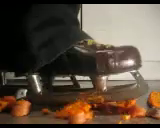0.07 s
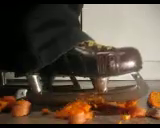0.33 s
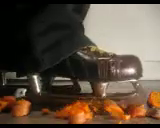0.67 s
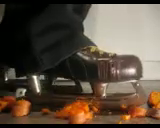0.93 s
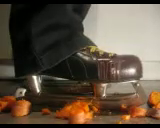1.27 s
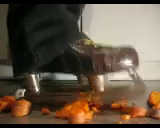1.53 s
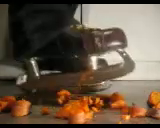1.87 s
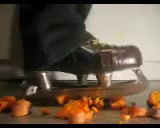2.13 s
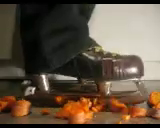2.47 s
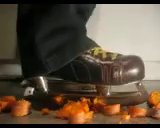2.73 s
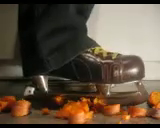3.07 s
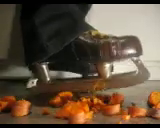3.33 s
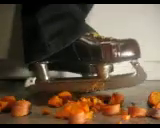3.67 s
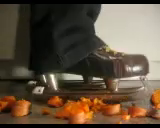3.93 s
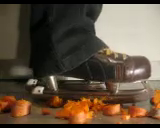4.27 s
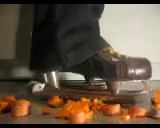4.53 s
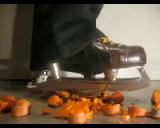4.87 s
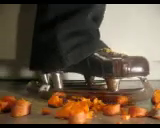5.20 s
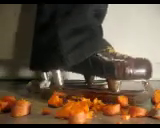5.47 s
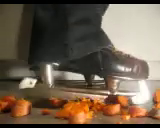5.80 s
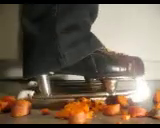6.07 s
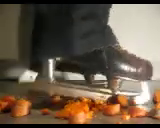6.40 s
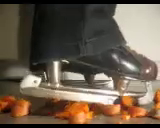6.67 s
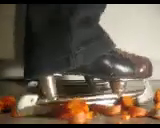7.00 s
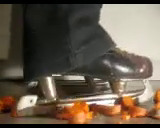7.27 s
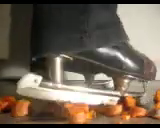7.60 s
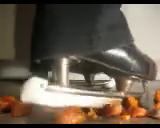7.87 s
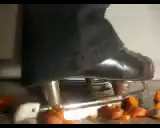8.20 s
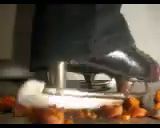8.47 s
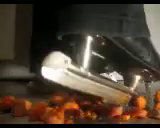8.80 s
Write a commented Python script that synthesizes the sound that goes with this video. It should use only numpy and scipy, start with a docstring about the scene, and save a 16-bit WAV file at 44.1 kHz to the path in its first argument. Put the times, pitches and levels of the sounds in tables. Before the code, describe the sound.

In a small room, an ice skate stamps repeatedly on carrots on a hard floor. The carrots snap and crunch in irregular clusters, the steel blade giving tiny metallic clicks before it knocks dully on the floor. Between stamps it scrapes softly through wet pulp and crumbs. The heaviest steps leave a deep, brief rumble. The microphone sits near the floor, sounds dull, distorts on the hardest hits and picks up faint hiss and hum.

```python
"""Carrots snap and crunch under an ice skate stamping on a hard floor in a small room.
The steel blade rings briefly, breaks through, knocks on the floor, then drags through pulp and crumbs.
The floor sways under the heaviest steps. Behind it: hiss, a low hum and a thin whine.
The microphone is dull and clips the hardest hits."""
import sys
import numpy as np
from scipy import signal
from scipy.fft import rfft, irfft, next_fast_len
from scipy.io import wavfile
from scipy.ndimage import map_coordinates

SR = 44100
rng = np.random.default_rng(int(sys.argv[2]) if len(sys.argv) > 2 else 0)


def put_to_file(sound):
    """Save the sound as 16-bit audio at rate SR, in the file named by the first command-line argument."""
    columns = np.atleast_2d(sound).T  # one column per channel
    safe = np.clip(columns, -1, 1)
    whole_steps = np.round(safe * 32767)
    wavfile.write(sys.argv[1], SR, whole_steps.astype(np.int16))


N = 393813

# steel blade modes, damped by pulp: (frequency [Hz], level [dB], t60 [s])
BLADE_MODES = [(2560, -5, .011), (2900, -4, .015), (3130, 0, .019), (3300, -1, .017), (4400, -12, .01)]
# bursting carrot cells: (frequency [Hz], spectral density [dB])
CRACKLE_SPECTRUM = [(200, -12), (600, -1), (1100, -2.5), (1700, -10.5), (2500, -11.5), (3300, -7.5),
                    (3900, -8.5), (5000, -8), (6000, -8.5), (8000, -25)]
# blade slides through pulp: (middle [s], length [s], level [dB], rasp above 2 kHz [dB])
DRAG_STROKES = [(0.542, 0.11, -39, -1.5), (0.92, 0.031, -42, -5), (1.032, 0.096, -46, -22),
                (1.63, 0.34, -49, -3), (1.897, 0.072, -45, -2.5), (2.173, 0.11, -47, 7.5),
                (2.728, 0.24, -51.5, 2.5), (3.218, 0.1, -39.5, -17), (3.334, 0.061, -45.5, 5),
                (3.9, 0.08, -39, -1.5), (3.984, 0.1, -31, -6.5), (4.535, 0.039, -37.5, -7.5),
                (4.59, 0.036, -34.5, -14), (4.945, 0.12, -43.5, 1.5), (5.465, 0.038, -43.5, 5.5),
                (5.54, 0.14, -40.5, -9), (5.864, 0.074, -46.5, -11), (5.985, 0.31, -39.5, -3),
                (6.133, 0.086, -47, -0.5), (6.376, 0.14, -37.5, -5.5), (6.851, 0.2, -44, -4),
                (7.103, 0.17, -46.5, 1), (7.264, 0.05, -44, -2), (7.394, 0.25, -47, -2),
                (8.415, 0.38, -44, -16), (8.873, 0.081, -33.5, 2)]


def snaps(splinter_db=-8):
    """A carrot fractures: sharp crack, short spray of splinters, ring of the blade."""
    # (time [s], level [dB], pitch [Hz], blade ring [dB])
    fractures = [(0.3914, -12.5, 2700, -16), (0.43, -25.5, 2400, -8), (0.467, -23, 2900, -9.5),
                 (0.594, -11, 2400, -22), (0.6438, -5, 2200, -36), (0.6492, 6.5, 2200, -24),
                 (0.8365, -39, 3200, 4), (0.994, -22.5, 1800, -32), (1.5248, -13.5, 2000, -24),
                 (1.5466, -8.5, 2520, -15.5), (1.6197, -20.5, 3100, -15), (2.1082, -26.5, 3100, -5),
                 (2.128, -22.5, 1900, -10), (2.163, -22, 2900, -7), (2.248, -32, 3000, 5),
                 (2.2719, -20, 3200, -15), (2.29, -24, 3100, -7), (2.304, -27, 3200, 4),
                 (2.3526, -12, 2200, -14.5), (2.359, -14, 3200, -7.5), (2.4081, -18.5, 3100, -6),
                 (2.4431, -8, 2900, -10.5), (2.453, -14, 3100, -3), (2.631, -25, 3400, -5),
                 (3.182, -22, 1900, -33), (3.247, -18, 2400, -26), (3.3198, -11.5, 2800, -12.5),
                 (3.398, -33.5, 2700, -5), (4.107, -17.5, 2700, -19), (4.121, -29, 3400, 7.5),
                 (4.169, -20, 2700, -30), (4.5958, -16.5, 2000, -36), (4.6813, -8.5, 3100, -16),
                 (4.909, -18, 2700, -21), (5.01, -24, 2900, -10), (5.018, -7, 2400, -21),
                 (5.0436, -1, 2400, -21), (5.09, -5.5, 2900, -17), (5.1065, -9.5, 2000, -27),
                 (5.1088, -3, 2900, -8), (5.283, -21.5, 3200, -2.5), (6.1553, -19, 3200, -7),
                 (6.408, -17.5, 2600, -21), (6.995, -25, 1900, -31), (6.996, -4.5, 2600, -15),
                 (7.3466, -20.5, 2300, -24), (7.657, -17.5, 2200, -25), (7.9485, -31, 1700, -28.5),
                 (8.0334, -17, 2880, -18), (8.1345, -18.5, 3100, -2.5), (8.157, -10, 4300, -30),
                 (8.2578, -20, 2100, -24), (8.33, -27, 2000, -12)]
    out, t = np.zeros(N), np.arange(SR // 20) / SR
    for s, db, hz, ring_db in fractures:
        crack = push(low_hz=0.047 * hz, high_hz=3.8 * hz + 600, order=3)
        band = signal.butter(1, [0.5 * hz, 0.91 * hz], "band", fs=SR, output="sos")
        splinters = unit(signal.sosfilt(band, rng.standard_normal(len(t))))
        fade = amp(-60 * t / 0.0052) + amp(-17 - 60 * t / 0.063)
        steel = ring(BLADE_MODES, scatter_db=2.5, detune=0.012)
        add(out, s, amp(db - 10) * crack)
        add(out, s, amp(db + splinter_db) * fade * splinters)
        add(out, s, amp(db + ring_db + 16.5) * steel)
    return out + amp(-14) * echo(out)


def crunch():
    """Cells burst in dense runs as the edge sinks in, shaking blade and floor."""
    # (start [s], length [s], level [dB], bite [dB], growth [dB], release t60 [s], body [dB], ring [dB])
    cuts = [(0.593, 0.065, -31, 30, 16, 0.025, 2, -11), (1.547, 0.11, -50, 17, -9, 0.3, -4, 1),
            (2.269, 0.039, -28, 0, -15, 0.16, -3.5, -2.5), (2.362, 0.1, -42.5, 12.5, 3, 0.05, 0, -1),
            (2.43, 0.033, -25, 4, 3.5, 0.019, -4.5, -5), (2.619, 0.034, -36.5, -9, -4, 0.13, -18.5, 2.5),
            (4.118, 0.051, -44.5, 16.5, -4, 0.35, -22, 6), (5.013, 0.11, -31, -2.5, -1, 0.26, 0, -1),
            (5.272, 0.075, -44.5, 10.5, -4, 0.15, -15, -0.5), (5.981, 0.038, -48.5, -5.5, 6.5, 0.15, 5, 7),
            (6.945, 0.052, -33, 0, 20, 0.16, 4, -20), (7.881, 0.075, -38, 7.5, 18, 0.084, 0.5, -1.5),
            (8.033, 0.13, -28.5, 1.5, 5.5, 0.18, -1.5, -4.5), (8.846, 0.061, -37.5, -9, -4, 0.26, -17, -7)]
    # low body of the crunch: (frequency [Hz], spectral density [dB])
    body_spectrum = [(30, -14), (70, 0), (98, -9.5), (125, -5), (190, -1), (260, 4.5), (350, -7),
                     (500, -1.5), (650, -12.5), (1000, -14), (2000, -38.5)]
    cells = unit(bursts(per_s=4800, spread_db=3.5) * amp(3.8 * wobble(300)))  # fibres give way in clumps
    crackle, body = coloured(cells, CRACKLE_SPECTRUM), coloured(cells, body_spectrum)
    out = np.zeros(N)
    for start_s, length_s, db, bite_db, growth_db, release_s, body_db, ring_db in cuts:
        gain = amp(db) * cut_envelope(start_s, length_s, bite_db, growth_db, release_s)
        out += gain * (amp(-4) * crackle + amp(body_db - 1) * body)
        steel = ring(BLADE_MODES, scatter_db=1.5, detune=0.012)  # each carrot loads it differently
        out += amp(ring_db - 3.5) * signal.oaconvolve(gain * cells, steel)[:N]
    return out + amp(-17) * echo(out)


def cut_envelope(start_s, length_s, bite_db, growth_db, release_s, entry_s=0.00091, bite_s=0.01):
    """The edge bursts the skin, sinks in under changing pressure and is through; the crackle dies."""
    t = np.maximum(np.arange(N) / SR - start_s, 0)
    skin_db = bite_db * np.exp(-t / bite_s)
    pressure_db = growth_db * (np.minimum(t / length_s, 1) - 0.5)
    release_db = -60 * np.maximum(t - length_s, 0) / release_s
    return np.minimum(t / entry_s, 1) * amp(np.maximum(skin_db + pressure_db + release_db, -200))


def knocks(rebound_cycles=2.114):
    """Blade and carrot pieces hit the floor. Pulp cushions: softer contact, lower thud, later rebound."""
    # (time [s], level [dB], contact hardness [Hz], floor ring [dB], room [dB])
    hits = [(0.594, -7, 1410, -2, -6.5), (0.655, -6, 920, 4, -4.5), (1.2126, -10, 660, 2.5, -5.5),
            (1.435, -23, 1500, -30, -1), (2.1258, -32.5, 700, 11.5, 6.5), (2.273, -17.5, 920, 6, -18),
            (2.4642, -12.5, 360, 0, -15), (2.881, -8.5, 920, 3.5, -4.5), (2.8906, -7.5, 640, -4, -10.5),
            (3.9065, -8.5, 843, 4, -7.5), (4.3463, 0, 1174, -7.5, -7.5), (5.107, -27.5, 1170, 0, -10),
            (6.4969, -12, 783, 4.5, -12.5), (6.9803, -17.5, 1550, -12, 6), (6.994, -8, 1480, 9.5, -18),
            (7.038, -21.5, 450, -5.5, -8), (7.1977, -30, 1480, -16, 0), (7.2144, -29, 1400, -14, -5),
            (7.229, -26.5, 1410, -15, -1.5), (7.347, -27.5, 1480, -11, 3), (7.931, -18.5, 840, 2.5, 0.5),
            (7.9477, -8.5, 1390, 6.5, -9.5), (8.034, -20, 850, 9.5, 5.5), (8.0749, -15.5, 900, 9.5, -14),
            (8.086, -14.5, 1070, 9.5, 4), (8.183, -16, 326, -2.5, -11), (8.633, -27, 2070, -17, -5)]
    # (frequency [Hz], level [dB], t60 [s])
    floor_modes = [(73.6, -19, 0.33), (127.3, -2.5, 0.37), (160.1, -5.5, 0.23), (186.6, -8, 0.32),
                   (251, -7, 0.22), (272.5, 5, 0.11), (348, -11, 0.04), (408, -12, 0.019), (500, 1, 0.031)]
    out = np.zeros(N)
    for s, db, hz, floor_db, room_db in hits:
        blow = -push(low_hz=0.19 * hz, high_hz=hz, order=5)
        rebound = -push(low_hz=0.28 * hz, high_hz=0.65 * hz, order=4)
        floor = signal.fftconvolve(blow, ring(floor_modes, scatter_db=4, detune=0.015))[:len(blow)]
        add(out, s, amp(db) * (blow + amp(floor_db - 16) * floor + amp(room_db - 3.5) * echo(blow)))
        add(out, s + rebound_cycles / hz, amp(db - 4) * rebound)
    return out


def drags(rasp_hz=2000):
    """The sliding edge grinds wet crumbs in jerks; shifting contact favours one mode after another."""
    # (frequency [Hz], width [Hz], level [dB])
    scrape_modes = [(238, 230, 0.5), (746, 320, -1), (1145, 160, -3.5), (1730, 58, -6.5), (2220, 2100, -7),
                    (2850, 93, -5.5), (3090, 57, -2), (4260, 270, -14.5)]
    # (frequency [Hz], spectral density [dB])
    pulp_spectrum = [(100, 4), (260, 4), (400, -2), (1000, -2), (1600, -9.5), (3000, 3.5), (4500, -42.5),
                     (6000, -2)]
    jerks = amp(3 * wobble(110))
    slips = jerks * bursts(per_s=3600, spread_db=1.5)
    creak = np.zeros(N)
    for hz, width_hz, db in scrape_modes:
        contact = amp(6 * wobble(30))
        creak += amp(db) * contact * unit(filtered(slips, resonance(hz, width_hz)))
    grind = amp(-4) * unit(creak) + amp(-2) * coloured(slips, pulp_spectrum)
    rub = filtered(grind, lambda hz: 1 / (1 + (hz / rasp_hz) ** 6))
    rasp = grind - rub
    out = sum(amp(db) * arch(middle_s, length_s) * (rub + amp(rasp_db) * rasp)
              for middle_s, length_s, db, rasp_db in DRAG_STROKES)
    return out + amp(-13.5) * echo(out)


def crumbs():
    """Crumbs pop at random: many under the sliding edge, a few faint ones under the resting weight."""
    sliding = sum(amp(db) * arch(middle_s, length_s) for middle_s, length_s, db, _ in DRAG_STROKES)
    pops = amp(-14.5) * sliding * coloured(bursts(per_s=40, spread_db=3), CRACKLE_SPECTRUM)
    pops += amp(-59) * coloured(bursts(per_s=5, spread_db=3), CRACKLE_SPECTRUM)
    return pops + amp(-4.5) * echo(pops)


def floor_sway(rise_s=0.35):
    """The whole floor bobs after a heavy step."""
    # (time [s], level [dB], frequency [Hz], t60 [s])
    steps = [(0.683, -26.5, 25.8, 1.8), (2.47, -27, 27.2, 1.06), (6.999, -23, 26.2, 1.2),
             (8.14, -19, 26.9, 1.12)]
    out, t = np.zeros(N), np.arange(SR) / SR
    for s, db, hz, t60_s in steps:
        envelope = amp(db - 60 * t / t60_s) * (1 - np.exp(-t / rise_s))
        add(out, s, envelope * np.sin(2 * np.pi * hz * t))
    return out


def echo(x, build_s=0.00076):
    """Diffuse tail of the small room; treble dies first."""
    # (frequency [Hz], t60 [s])
    room_decay = [(100, 0.48), (400, 0.4), (900, 0.29), (2000, 0.1), (5000, 0.17)]
    hz, t, noise = signal.stft(rng.standard_normal(SR // 3), SR, nperseg=256)
    decay = amp(-60 * t / along(room_decay, hz)[:, None])
    tail = signal.istft(noise * decay, SR, nperseg=256)[1]
    tail *= 1 - np.exp(-(np.arange(len(tail)) / SR / build_s) ** 2)
    return signal.fftconvolve(x, tail / np.linalg.norm(tail))[:len(x)]


def background(hiss_db=-45, hum_hz=70, hum_db=-60, whine_hz=2912, waver_hz=36):
    """Even microphone hiss, a low hum and a thin, wavering whine that swells in spells."""
    # (frequency [Hz], spectral density [dB])
    hiss_spectrum = [(12, -39), (20, -7.5), (74, -5.5), (180, -9.5), (270, -10.5), (400, -12.5),
                     (600, -15.5), (1200, -21.5), (2000, -21), (3000, -20.5), (3800, -25.5), (6000, -22)]
    # (middle [s], length [s])
    whine_spells = [(0.178, 1), (1.28, 0.36), (2.936, 0.13), (3.902, 0.31)]
    hiss = amp(hiss_db) * coloured(rng.standard_normal(N), hiss_spectrum)
    hum = amp(hum_db) * unit(filtered(rng.standard_normal(N), resonance(hum_hz, width_hz=2.1)))
    pitch_hz = whine_hz + waver_hz * wobble(90)
    whine = unit(np.sin(2 * np.pi * np.cumsum(pitch_hz) / SR))
    spells = sum(arch(middle_s, length_s) for middle_s, length_s in whine_spells)
    return hiss + hum + (amp(-68) + amp(-60.5) * spells) * whine


def ring(modes, scatter_db, detune):
    """Damped modes, struck a little differently each time; energy 1."""
    t = np.arange(SR // 3) / SR
    draws = rng.standard_normal((len(modes), 2))
    wave = sum(amp(db + scatter_db * a - 60 * t / t60_s) * np.sin(2 * np.pi * hz * (1 + detune * b) * t)
               for (hz, db, t60_s), (a, b) in zip(modes, draws))
    return wave / np.linalg.norm(wave)


def push(low_hz, high_hz, order):
    """Short band-limited pressure pulse; peak 1."""
    low_hz, high_hz = np.clip([low_hz, high_hz], 20, SR / 3)
    highpass = signal.butter(2, low_hz, "high", fs=SR, output="sos")
    lowpass = signal.butter(order, high_hz, fs=SR, output="sos")
    pulse = signal.sosfilt(np.vstack([highpass, lowpass]), signal.unit_impulse(SR // 20))
    return np.pad(pulse / np.abs(pulse).max(), (0, SR // 3))


def bursts(per_s, spread_db):
    """Randomly timed impulses of uneven size; rms 1."""
    size = amp(spread_db * np.clip(rng.standard_normal(N), -2, 2))
    return unit((rng.random(N) < per_s / SR) * size * rng.choice([-1, 1], N))


def wobble(knots_per_s):
    """Smooth random curve."""
    knots = rng.standard_normal(int(N * knots_per_s / SR) + 4)
    return map_coordinates(knots, [np.arange(N) * knots_per_s / SR])


def resonance(hz, width_hz):
    """Frequency response of one damped mode."""
    return lambda f: 1j * f * width_hz / (hz * hz - f * f + 1j * f * width_hz)


def arch(middle_s, length_s, rise_share=0.25, exponent=0.52):
    """Rounded rise and fall to silence; peak 1."""
    progress = np.clip((np.arange(N) / SR - middle_s) / length_s + 0.5, 0, 1)
    phase = np.interp(progress, [0, rise_share, 1], [0, 0.5, 1])
    return np.abs(np.sin(np.pi * phase)) ** exponent


def amp(db):
    """Decibels to gain."""
    return 10 ** (np.asarray(db) / 20)


def unit(x):
    """Scale to rms 1."""
    return x / np.sqrt(np.mean(x ** 2) + 1e-20)


def along(points, hz):
    """Read (Hz, value) points on a log axis."""
    f, v = np.transpose(points)
    return np.interp(np.log(hz + 1), np.log(f + 1), v)


def filtered(x, response):
    """Multiply the spectrum by a function of frequency."""
    size = next_fast_len(N + SR // 2)
    return irfft(rfft(x, size) * response(np.fft.rfftfreq(size, 1 / SR)), size)[:N]


def coloured(x, spectrum, size=8192):
    """Causal filter with the given spectrum; the result has rms 1."""
    cepstrum = irfft(np.log(amp(along(spectrum, np.fft.rfftfreq(size, 1 / SR)))))
    cepstrum[1:size // 2] *= 2
    cepstrum[size // 2 + 1:] = 0
    return unit(signal.fftconvolve(x, irfft(np.exp(rfft(cepstrum))))[:N])


def add(track, s, sound):
    """Mix a sound in at time s."""
    part = track[max(round(s * SR), 0):][:len(sound)]
    part += sound[:len(part)]


def scene():
    """All sources at one microphone near the floor."""
    return (knocks() + snaps() + crunch() + drags() + crumbs() + floor_sway() + background())[None]


def record(dry, top_hz=16000):
    """The input clips the hardest blows and loses treble; sharp snaps overshoot and clip again."""
    # dull, slight presence peak: (frequency [Hz], gain [dB])
    mic_response = [(1300, 0), (2300, 2), (3300, 2), (4800, 0), (5400, -4), (5800, -15), (6200, -38),
                    (7000, -80), (9000, -100)]
    flattened = np.clip(dry[0], -0.58, 0.58)
    dull = filtered(flattened, lambda hz: amp(along(mic_response, hz)))
    clipped = np.clip(dull, -0.65, 0.65)
    return filtered(clipped, lambda hz: hz < top_hz)[None]


dry = scene()
out = record(dry)
put_to_file(out)
```